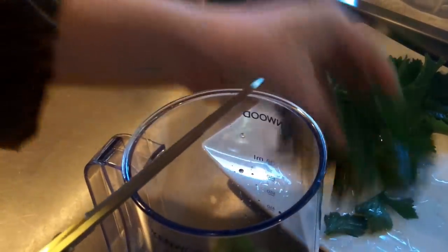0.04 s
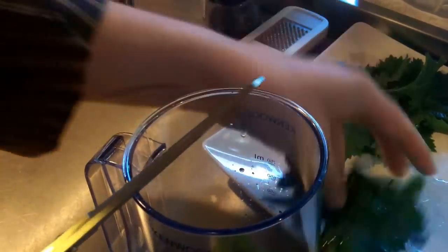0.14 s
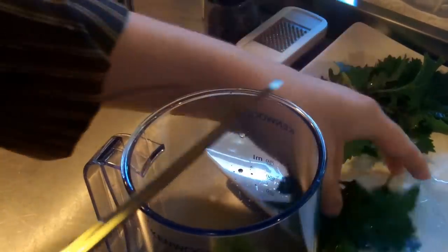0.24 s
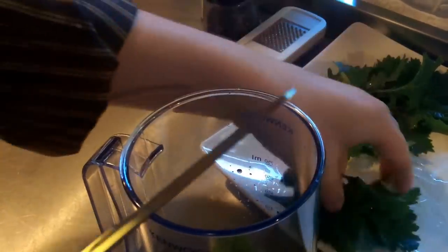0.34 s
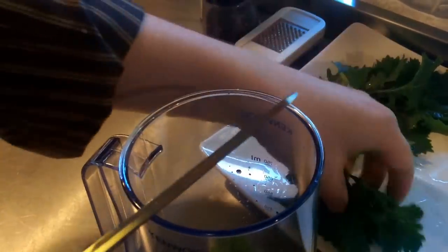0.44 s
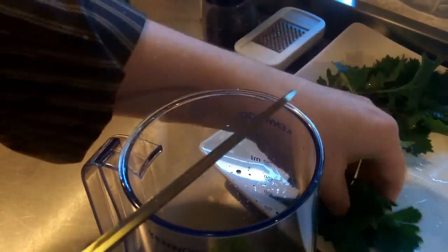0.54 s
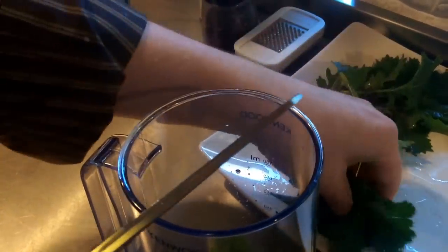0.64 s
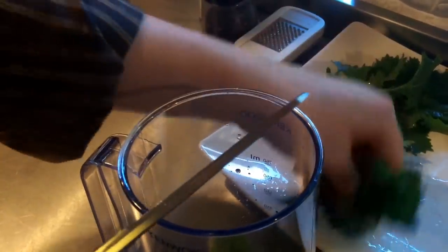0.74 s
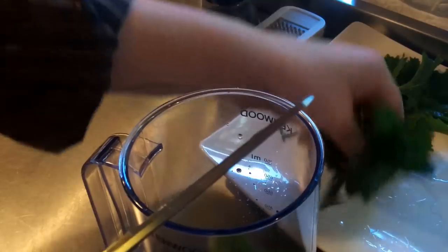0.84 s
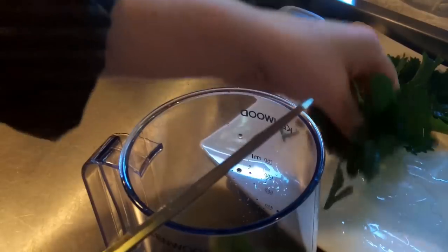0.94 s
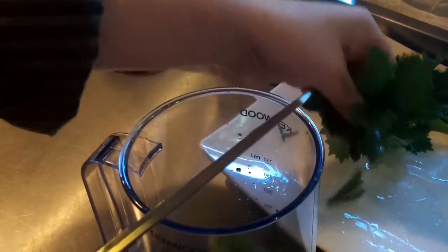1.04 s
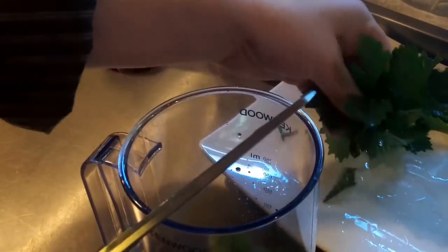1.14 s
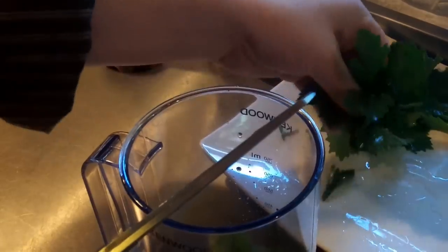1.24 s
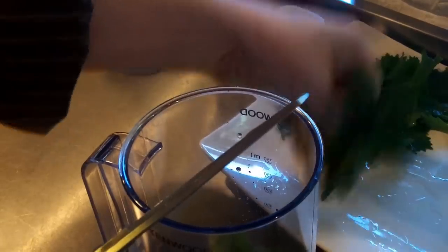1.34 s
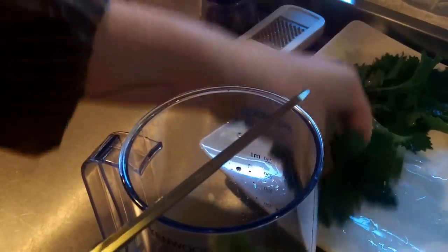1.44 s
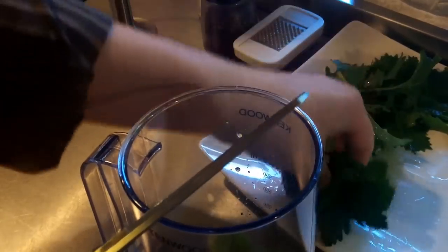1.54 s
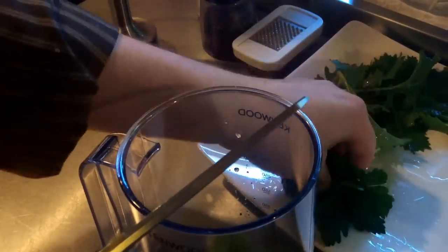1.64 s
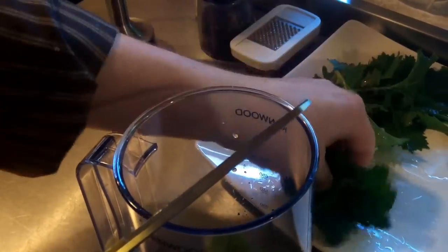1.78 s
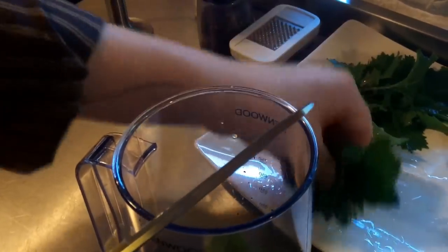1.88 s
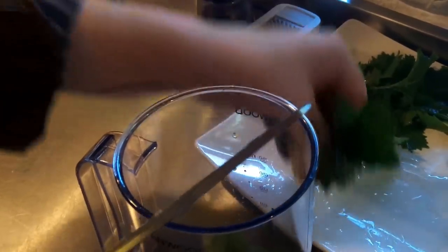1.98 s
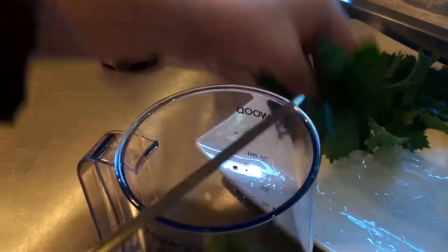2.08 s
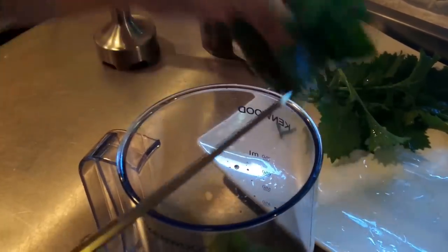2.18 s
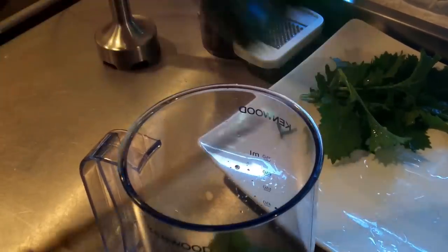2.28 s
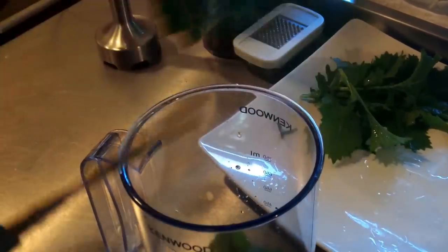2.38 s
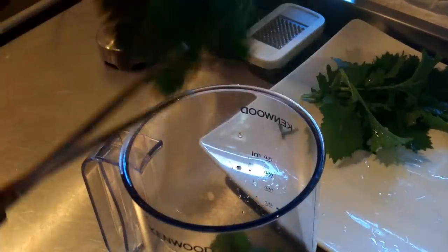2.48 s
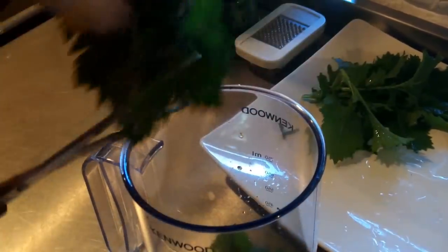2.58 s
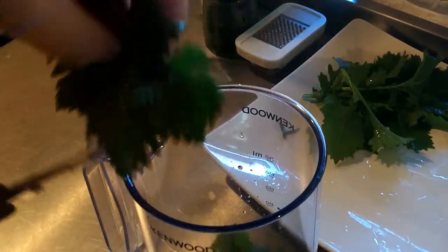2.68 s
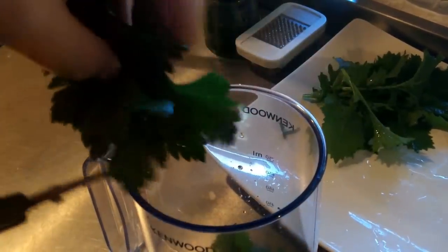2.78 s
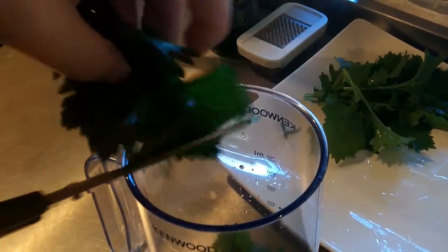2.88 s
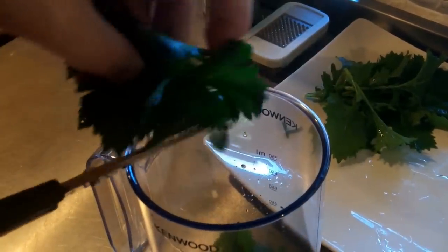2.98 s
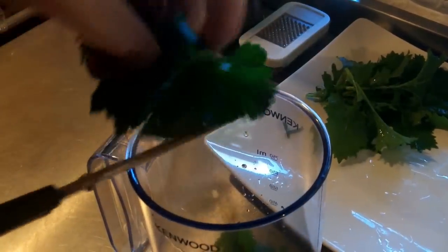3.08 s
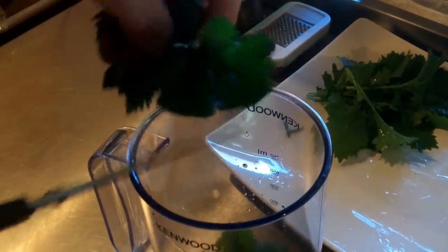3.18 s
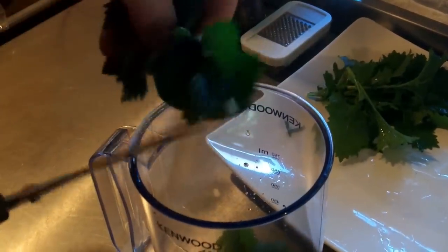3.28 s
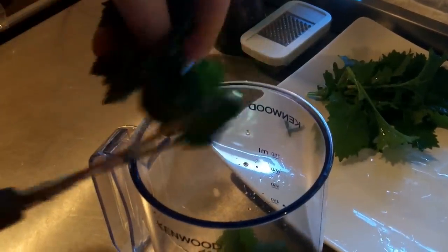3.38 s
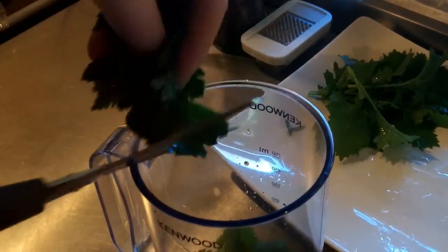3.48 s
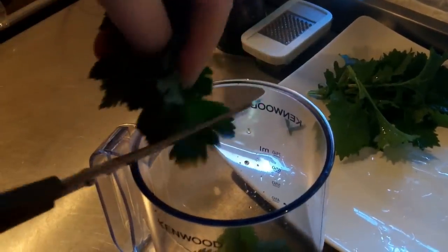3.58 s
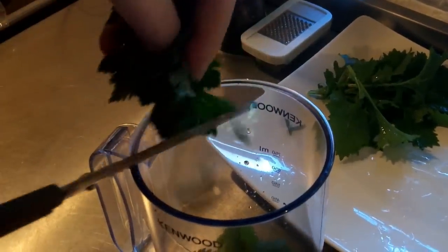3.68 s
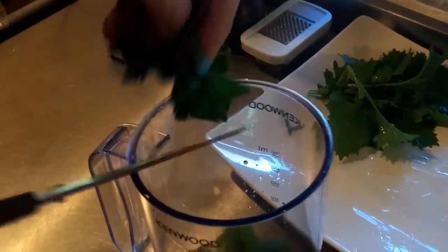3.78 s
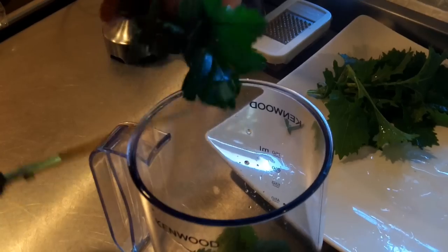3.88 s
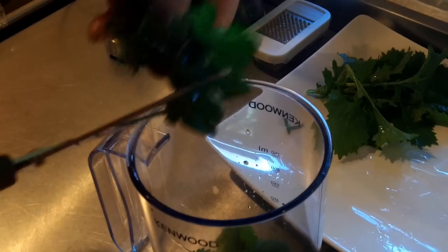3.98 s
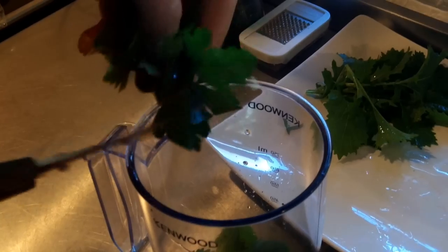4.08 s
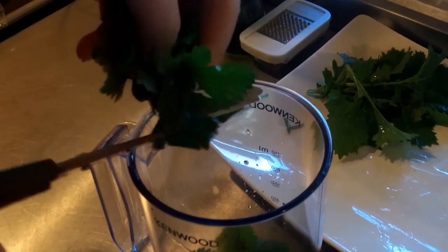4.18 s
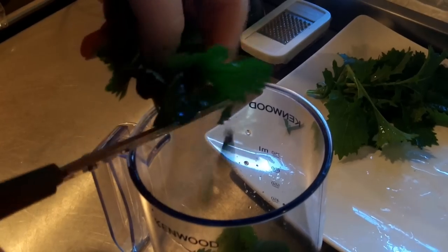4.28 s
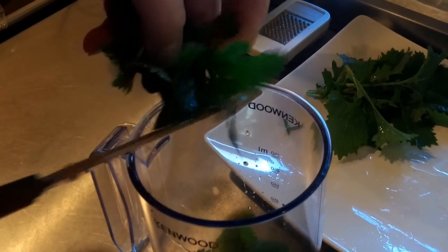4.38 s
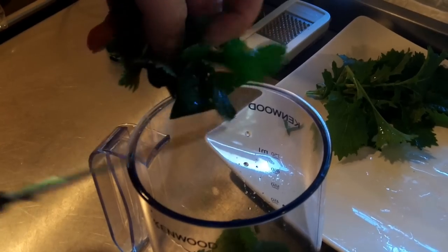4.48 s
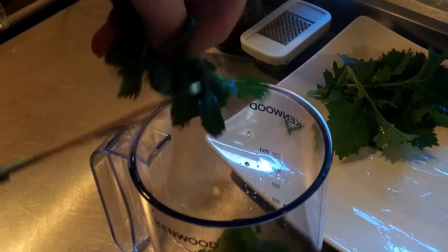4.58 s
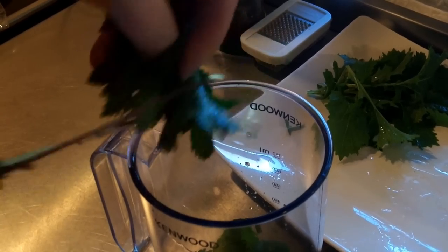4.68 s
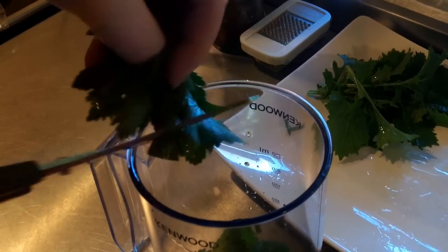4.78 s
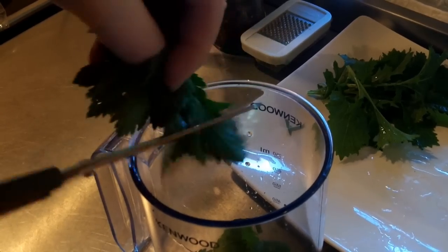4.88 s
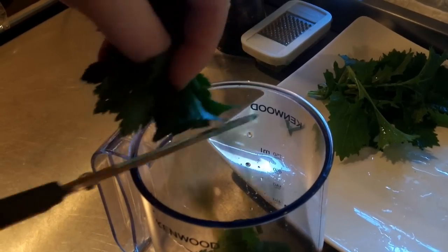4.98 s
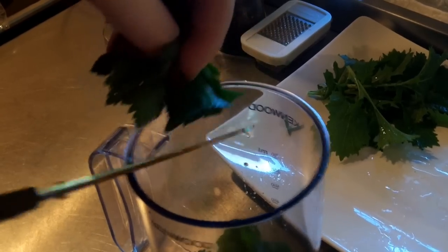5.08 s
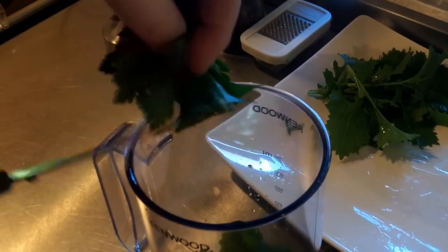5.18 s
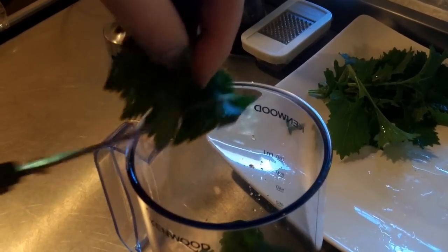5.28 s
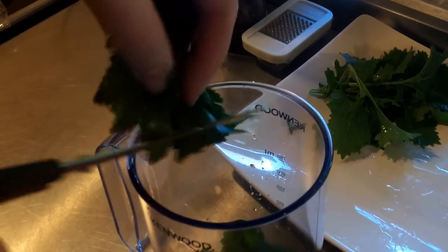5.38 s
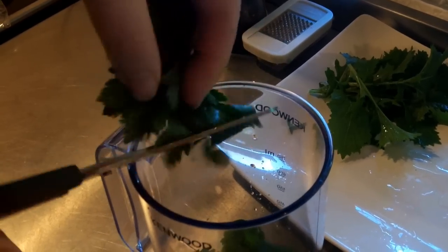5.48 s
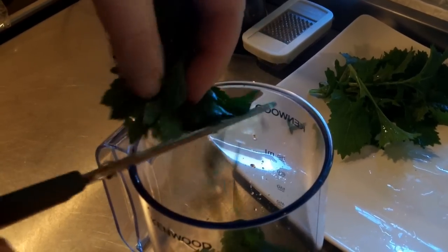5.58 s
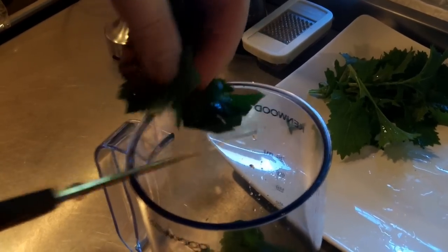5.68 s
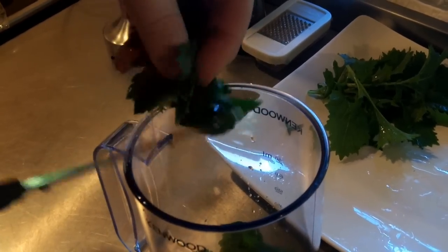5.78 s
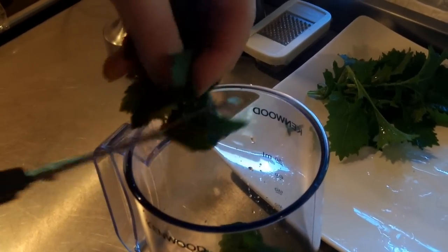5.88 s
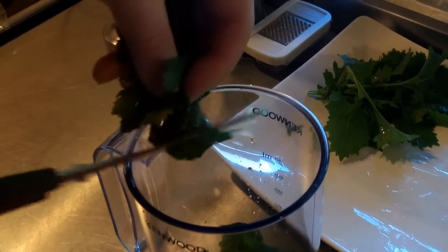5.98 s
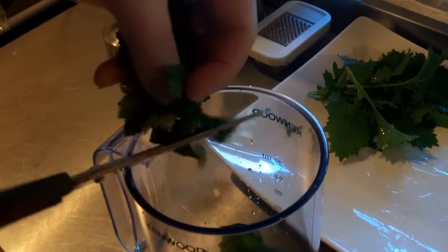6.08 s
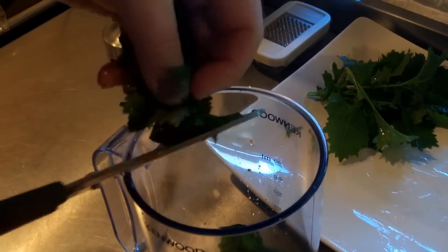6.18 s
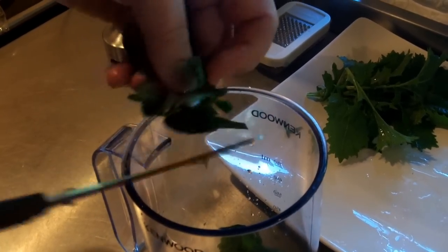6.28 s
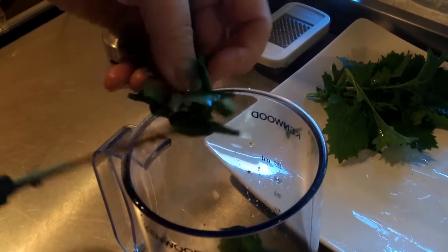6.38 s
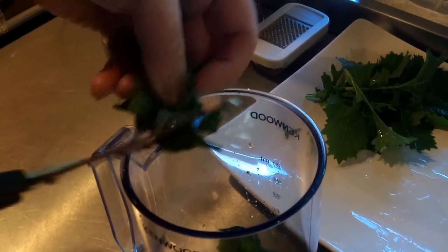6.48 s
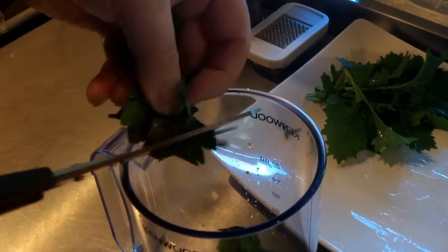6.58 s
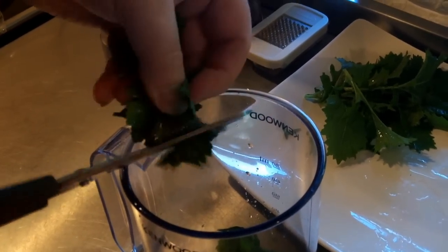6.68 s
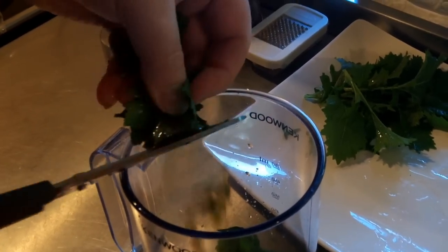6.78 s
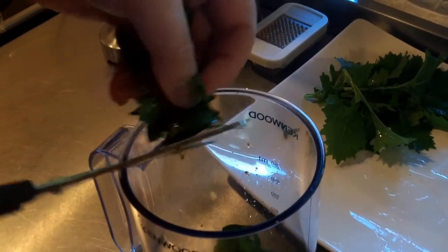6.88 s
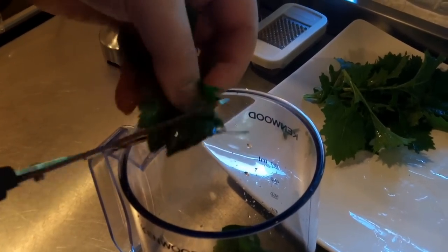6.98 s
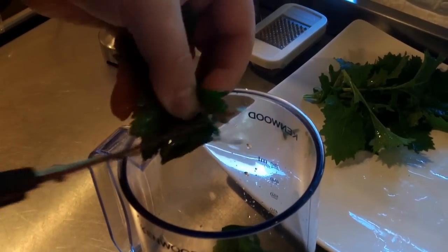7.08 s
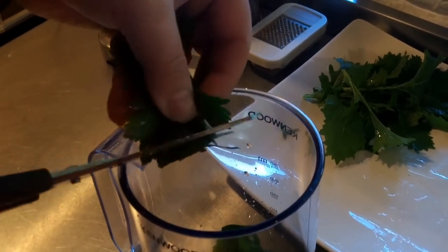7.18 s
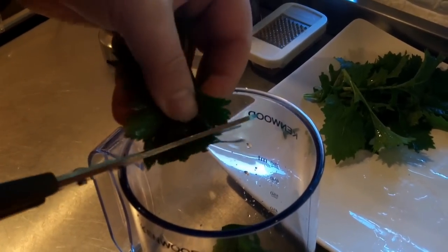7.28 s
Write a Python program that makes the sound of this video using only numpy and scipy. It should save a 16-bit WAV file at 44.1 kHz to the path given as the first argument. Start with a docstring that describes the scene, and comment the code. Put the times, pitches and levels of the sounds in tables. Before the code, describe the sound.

Kitchen scissors snip leafy herbs over a plastic jug, hard clacks ringing in a small room, with leaf rustle, stem snaps and steady faint hiss.

```python
"""Scissors on leafy herbs

Kitchen scissors snip herbs over a plastic jug in a small hard-walled kitchen, over low air noise and steady hiss.
Leaves rustle and crunch as clouds of tiny random fractures; knocks on the board are damped modes and noise bursts.
Stems snap as a few short modes with a brief spray of noise. Each cut sums modes of handles and blades with long
rings of the jug, standing waves of the room and diffuse echoes that decay at a rate set for each frequency band."""
import sys
import numpy as np
from scipy import signal
from scipy.fft import rfft, irfft
from scipy.io import wavfile

SR = 44100
rng = np.random.default_rng(int(sys.argv[2]) if len(sys.argv) > 2 else 0)


def transcribe(signal):
    """Save signal, clipped to [-1, 1], as a 16-bit WAV file at the path in sys.argv[1]."""
    frames = np.atleast_2d(signal).T
    limited = np.clip(frames, -1, 1)
    pcm = np.round(limited * 32767).astype(np.int16)
    wavfile.write(sys.argv[1], SR, pcm)


N = 323694
HIT_SIZE = 32768  # samples in one blow
TIME, AGE = np.arange(N) / SR, np.arange(HIT_SIZE) / SR  # seconds in the scene, seconds since a blow

# Event levels are nominal: knocks, bumps, snaps and cuts add offsets per layer; leaf levels are used directly.
# low rush of the kitchen: (frequency [Hz], level [dB])
AIR_SPECTRUM = [(20, -9), (45, -5), (75, -11), (110, -2), (150, -6.5), (220, -13.5), (280, -4.5),
                (360, -12), (480, -7), (700, -12.5), (1200, -12.5), (2500, -14.5), (4500, -16.5),
                (6500, -20.5)]
# fingers squeezing the leaves: (time of the height [s], level [dB], time from height to 1/e [s])
SQUEEZES = [(.74, -57.5, 0.1), (1.76, -63, .07), (3.02, -61.5, 0.18), (3.72, -58.5, .035),
            (4.327, -55.5, 0.037), (4.994, -53.5, 0.032), (5.573, -58, 0.092), (5.768, -53.5, 0.024),
            (6.19, -54, .04), (6.759, -56, 0.054)]
# stems crushed between fingers or blades: (time at the thickest [s], level [dB], half the 1/e time [s])
CRUNCHES = [(0.821, -50, .006), (4.616, -44.5, 0.012), (5.238, -45, 0.0025), (5.593, -41.5, 0.0057),
            (6.47, -43, 0.0033), (6.787, -34.5, 0.0032), (6.817, -39, 0.0033), (7.026, -37.5, 0.0034)]
# radiation of leaves and stems: (frequency [Hz], level [dB])
LEAF_SPECTRUM = [(200, -8), (1000, -14.5), (2000, -1.5), (3300, 1), (5000, 0.5), (6200, -6), (7500, -7.5)]
# handles ringing under a grinding blade: (frequency [Hz], level [dB], t60 [s])
GRIND_MODES = [(1457, 0, .22)]
# knocks while leaves are gathered from the board: (time [s], level [dB], boom level [dB])
KNOCKS = [(0.3481, -19.5, -24.5), (1.5615, -46, -49.5), (1.5843, -28.5, -35.5), (1.6189, -33, -40.5)]
# dull bump against the jug: (time [s], level [dB])
BUMPS = [(5.2734, -21)]
# board rung by a knock: (frequency [Hz], level [dB], t60 [s])
BOARD_MODES = [(136, 2.5, 0.36), (264.8, 10, 0.25), (284, -9, 0.45), (407, -8, 0.072), (446, -4.5, 0.85),
               (1220, 12.5, 0.03), (1660, 4, 0.064), (2130, 6, 0.039), (2780, 8, 0.067), (3070, 11, 0.029),
               (3420, 2, 0.044), (4060, 4, 0.052)]
# jug shifting on the worktop: (frequency [Hz], level [dB], t60 [s])
THUD_MODES = [(205, 0, 0.034), (290, 0, 0.16), (543, -3, 0.019)]
# dry crack of a blow: (frequency [Hz], level [dB])
CRACK_SPECTRUM = [(100, -24.5), (400, -4), (800, -19), (1300, 6.5), (2200, -14), (3000, 6.5), (3700, -19),
                  (5000, -6), (7500, -21)]
# room echoes of a knock: (frequency [Hz], level [dB])
KNOCK_ECHO_SPECTRUM = [(25, 0), (70, -24), (135, -4), (200, -10), (290, 2), (450, -1), (650, -5.5),
                       (1000, -7), (1700, -8), (3000, -15), (4500, -21), (7500, -46)]
# room echoes of a bump: (frequency [Hz], level [dB])
BUMP_ECHO_SPECTRUM = [(25, -18), (90, -1.5), (200, -12), (320, 3), (480, -1), (800, -10), (1500, -19.5),
                      (3500, -27.5), (7500, -60)]
# worktop rumbling on after a knock: (frequency [Hz], level [dB])
WORKTOP_SPECTRUM = [(25, 0.5), (130, 3.5), (300, 1), (480, -4.5), (700, -17), (2000, -19.5), (5000, -37)]
# kitchen reverberation: (band centre [Hz], t60 [s])
ROOM_T60 = [(60, 0.63), (150, 0.75), (300, 0.29), (600, 0.26), (1300, .28), (3000, 0.19), (7000, 0.27)]
# standing waves of the kitchen: (frequency [Hz], level [dB], t60 [s])
ROOM_MODES = [(74, 4.5, 0.25), (98, 7, 0.49), (130.5, 0.5, 0.77), (161, 2, 0.34), (199.9, 8.5, 0.31),
              (252.5, 2.5, 0.64), (283, -1, 0.53), (313.4, 5.5, 0.33)]
# thick stems snapping: (time [s], level [dB], pitch [Hz])
SNAPS = [(0.6973, -42, 2780), (1.8445, -42, 4470), (2.5155, -29, 4000), (2.8379, -42, 3500),
         (3.1096, -33.5, 2210), (3.6182, -36.5, 5100), (4.3978, -31, 2240), (4.699, -37, 4300),
         (5.583, -34, 4750), (6.018, -41.5, 3280), (6.108, -39.5, 3900), (6.146, -24.5, 3410),
         (6.2062, -32, 4560), (6.2304, -37.5, 4240), (6.7414, -43, 3650), (6.787, -26, 3150),
         (6.8102, -38, 2920)]
# partials of a breaking stem: (multiple of its pitch [ratio], level [dB], t60 [s])
STEM_PARTIALS = [(.64, -7.5, 0.0074), (1, 0.5, 0.0073), (1.35, -2, .006), (1.62, -3, 0.012)]
# scissors closing: (time [s], handle clack [dB], blade click [dB], jug and room [dB])
SNIPS = [(3.899, -9.5, -20, -26.5), (4.565, -8.5, -19, -28), (5.179, -13, -24, -27),
         (5.3547, -30, -37.5, -45.5), (5.8097, -10.5, -21.5, -27.5), (6.4048, -11.5, -20.5, -29),
         (6.9487, -16.5, -35, -30.5)]
# plastic handles: (frequency [Hz], level [dB], t60 [s])
HANDLE_MODES = [(480, -18, 0.14), (836, -19.5, 0.039), (1242, -3, 0.04), (1474, -9.5, 0.051)]
# steel blades: (frequency [Hz], level [dB], t60 [s])
BLADE_MODES = [(2067, -9, 0.038), (2800, -12, 0.025), (2680, -1, 0.0068), (3184, -2, 0.015),
               (3375, -3, 0.011), (4124, -2.5, 0.016), (4180, -14, 0.0091), (5380, -1.5, 0.0074),
               (5680, -4.5, 0.0077), (6570, -15, 0.011), (7350, -7.5, 0.006)]
# contact of the blades, over within a few cycles: (frequency [Hz], level [dB], t60 [s])
CONTACT_MODES = [(3000, -2, 0.001), (5050, 0, 0.0009)]
# long resonances of jug and scissors: (frequency [Hz], level [dB], t60 [s])
JUG_MODES = [(410, -3, .33), (451, 0, .3), (577, -6, .33), (641, -10, .3), (705, -13, .4),
             (807, -12.5, .35), (881, -13, .3), (1244, -7.5, .28), (1457, -7, .28), (2470, -26, .26),
             (3055, -15.5, .26), (3220, -24, .2), (3430, -25, .22), (4150, -25, .22), (4344, -21, .2)]
# room echoes of a cut: (frequency [Hz], level [dB])
SNIP_ECHO_SPECTRUM = [(25, -6), (70, -1.5), (160, -9), (280, 1), (480, 4.5), (700, -4.5), (1000, -8),
                      (1300, -4), (1550, -11), (1800, -17), (2400, -18.5), (3200, -13), (4400, -24.5),
                      (6000, -33.5), (7500, -48)]
# microphone response: (frequency [Hz], gain [dB])
MIC_RESPONSE = [(6000, 0), (7100, -1.5), (7400, -11.5), (7700, -19), (8000, -19), (8500, -15.5),
                (10000, -13), (15000, -16)]
# electronic hiss: (frequency [Hz], level [dB])
HISS_SPECTRUM = [(7000, -50), (8050, -23), (8500, -5.5), (9300, -1), (11000, 0.5), (15500, -0.5)]

HANDLING_DB = -72.5  # faint rustle of the bunch as it is held
GRIND_S, GRIND_DB = 7.021, -35.5  # steel grinds on steel at the end of the last cut
WORKTOP_T60 = .9  # s
STALK_DB, STALK_HZ = -44, 3900  # middle of the range of chance stalk snaps
HOLD_S = 0.19  # how long echoes hold after a nominal 0 dB clack; softer clacks hold in proportion
BOOM_DB = -7.5  # standing waves after a nominal 0 dB clack, relative to the jug and room level
TOP_HZ = 15500  # upper edge of the recorded band


def undb(db):
    """Logarithmic level: decibels become an amplitude ratio."""
    return 10 ** (np.asarray(db) / 20)


def unit(x):
    """Root-mean-square amplitude: scale to rms 1."""
    return x / np.sqrt(np.mean(x ** 2))


def lookup(hz, points):
    """Logarithmic frequency scale: interpolate (Hz, value) points along it."""
    f, value = np.transpose(points)
    return np.interp(np.log(np.maximum(hz, 1)), np.log(f), value)


def shape(x, points):
    """Linear filtering: multiply the spectrum by a response of (Hz, dB) points."""
    hz = np.fft.rfftfreq(len(x), 1 / SR)
    return irfft(rfft(x) * undb(lookup(hz, points)), len(x))


def colour(x, points):
    """Spectral colouring: filter by (Hz, dB) points, then scale to rms 1."""
    return unit(shape(x, points))


def fade(t, t60):
    """Exponential decay: linear losses take 60 dB in t60."""
    return np.exp(-np.log(1000) * t / t60)


def swell(rise_s):
    """Resonator build-up: amplitude approaches its full value exponentially after the blow."""
    return 1 - np.exp(-AGE / rise_s)


def burst(points, t60):
    """Decaying random vibration: coloured noise under an exponential envelope."""
    return colour(rng.standard_normal(HIT_SIZE), points) * fade(AGE, t60)


def ring(modes, detune, scatter_db):
    """Modal superposition: damped sines of alternating sign, each blow varying pitch and level a little."""
    chance = rng.standard_normal((len(modes), 2))
    out = np.zeros(HIT_SIZE)
    for k, ((hz, db, t60), (level_chance, pitch_chance)) in enumerate(zip(modes, chance)):
        tone = np.sin(2 * np.pi * hz * (1 + detune * pitch_chance) * AGE)
        out += (-1) ** k * undb(db + scatter_db * level_chance) * fade(AGE, t60) * tone
    return out


def waver(modes, depth, rate):
    """Multipath interference: random complex gains, rate knots a second, make each mode swell and sink alone."""
    knots = np.arange(64) / rate
    out = np.zeros(HIT_SIZE)
    for k, (hz, db, t60) in enumerate(modes):
        paths = np.interp(AGE, knots, rng.standard_normal(64) + 1j * rng.standard_normal(64))
        tone = np.imag((1 + depth * paths) * np.exp(2j * np.pi * hz * AGE))
        out += (-1) ** k * undb(db) * fade(AGE, t60) * tone
    return out


def room(points, hold_s, rise_s):
    """Diffuse reverberation: echoes build up, hold, then decay at each band's own rate."""
    spectrum = rfft(colour(rng.standard_normal(HIT_SIZE), points))
    hz = np.fft.rfftfreq(HIT_SIZE, 1 / SR)
    late = np.cbrt(AGE ** 3 + hold_s ** 3) - hold_s  # a clock that starts slowly, so the decay is held back
    out = np.zeros(HIT_SIZE)
    for centre, t60 in ROOM_T60:
        # overlapping triangular bands that sum to one
        share = lookup(hz, [(f, float(f == centre)) for f, _ in ROOM_T60])
        out += irfft(spectrum * share) * fade(late, t60)
    return out * swell(rise_s)


def add(track, s, sound):
    """Linear superposition: mix a sound into the track at time s."""
    start = int(s * SR)
    track[start:start + len(sound)] += sound[:N - start]


def kitchen_air():
    """Stationary noise: the low rush of the kitchen has a fixed spectrum."""
    return undb(-54.5) * colour(rng.standard_normal(N), AIR_SPECTRUM)


def squeeze():
    """Frictional effort: each squeeze of the leaves follows a Gaussian bell in time."""
    return sum(undb(db) * np.exp(-((TIME - s) / width_s) ** 2) for s, db, width_s in SQUEEZES)


def crackle(per_s, spread_db):
    """Random fracture process: plant cells break as chance clicks of uneven size and either sign."""
    when, size = rng.random(N), rng.standard_normal(N)
    grain_db = spread_db * np.minimum(rng.exponential(size=N), 4)
    clicks = (when < per_s / SR) * np.sign(size) * undb(grain_db)
    return colour(clicks, LEAF_SPECTRUM)


def leaves():
    """Amplitude-modulated fracture noise: sparse rustle follows the squeezes, denser crackle the crunches."""
    out = (undb(HANDLING_DB) + squeeze()) * crackle(per_s=300, spread_db=1.5)
    fractures = crackle(per_s=2200, spread_db=1.5)
    for s, db, half_s in CRUNCHES:
        out += undb(db) * np.exp(-abs(TIME - s) / (2 * half_s)) * fractures
    # when steel grinds on steel the handles sing along
    handles = ring(GRIND_MODES, detune=0.0019, scatter_db=1)
    add(out, GRIND_S, undb(GRIND_DB) * handles * swell(rise_s=0.0016))
    return out


def knocks():
    """Impact excitation: modes and a noisy crack sound together with echoes and worktop rumble."""
    out = np.zeros(N)
    for s, level_db, boom_db in KNOCKS:
        board = undb(level_db - 18.5) * waver(BOARD_MODES, depth=0.47, rate=54)
        crack = undb(level_db - 10.5) * burst(CRACK_SPECTRUM, t60=0.073)
        echoes = undb(boom_db - 6.5) * room(KNOCK_ECHO_SPECTRUM, hold_s=0.031, rise_s=0.00074)
        rumble = undb(boom_db - 14) * burst(WORKTOP_SPECTRUM, WORKTOP_T60) * swell(rise_s=0.012)
        add(out, s, (crack + board) * swell(rise_s=.0005) + echoes + rumble)
    return out


def stalks(count, spread_db, spread_octaves):
    """Load-driven failure: thin stalks snap by chance, likelier the firmer the squeeze."""
    effort = np.cumsum(squeeze())
    rows = []
    for when, size, pitch in rng.random((count, 3)):
        s = np.interp(when, effort / effort[-1], TIME)
        level_db = STALK_DB + spread_db * (2 * size - 1)
        hz = STALK_HZ * 2 ** (spread_octaves * (2 * pitch - 1))
        rows.append((s, level_db, hz))
    return rows


def snaps():
    """Sudden release of strain: a stem's modes, and a strong, brief spray of noise with a weaker, longer tail."""
    out = np.zeros(N)
    for s, level_db, hz in SNAPS + stalks(count=8, spread_db=2.5, spread_octaves=0.44):
        modes = [(hz * ratio, db, t60) for ratio, db, t60 in STEM_PARTIALS]
        stem = ring(modes, detune=.015, scatter_db=1.2)
        spray_envelope = undb(-1) * fade(AGE, t60=0.0062) + undb(-13) * fade(AGE, t60=0.13)
        spray = rng.standard_normal(HIT_SIZE) * spray_envelope
        add(out, s, undb(level_db) * (undb(-1) * stem + spray))
    return shape(out, LEAF_SPECTRUM)  # so small a thing radiates mainly treble


def scissors():
    """Coupled impact: handles clack, blades click, jug and room ring; a harder clack holds echoes longer."""
    out = np.zeros(N)
    for s, clack_db, click_db, room_db in SNIPS:
        clack = undb(clack_db + .5) * ring(HANDLE_MODES, detune=.003, scatter_db=.4)
        click = undb(click_db + 2.0) * ring(BLADE_MODES, detune=0.0074, scatter_db=1.5)
        contact = undb(click_db + 10.0) * ring(CONTACT_MODES, detune=0.013, scatter_db=1.8)
        # the worktop and the jug wall scatter the click back within milliseconds
        scatter = undb(click_db - 7.5) * burst(LEAF_SPECTRUM, t60=0.047)
        rings = undb(room_db + 3.0) * waver(JUG_MODES, depth=0.45, rate=69.4) * swell(rise_s=0.025)
        # a harder clack feeds the standing waves more energy
        boom_db = room_db + clack_db / 2 + BOOM_DB
        boom = undb(boom_db) * waver(ROOM_MODES, depth=0.35, rate=23.4) * swell(rise_s=0.019)
        hold_s = HOLD_S * undb(clack_db)
        echoes = undb(room_db - 2.0) * room(SNIP_ECHO_SPECTRUM, hold_s, rise_s=0.00074)
        add(out, s - .0007, clack + click + contact + scatter + rings + boom + echoes)
    return out


def jug_bumps():
    """Low-frequency impact: the jug shifts with a dull thud that excites the standing waves of the room."""
    out = np.zeros(N)
    for s, level_db in BUMPS:
        thud = undb(level_db - 3.5) * waver(THUD_MODES, depth=0.17, rate=44)
        crack = undb(level_db - 26) * burst(CRACK_SPECTRUM, t60=.04)
        boom = undb(level_db - 18.5) * waver(ROOM_MODES, depth=0.34, rate=21.5) * swell(rise_s=0.0092)
        echoes = undb(level_db - 9.5) * room(BUMP_ECHO_SPECTRUM, hold_s=0.035, rise_s=0.0017)
        add(out, s, thud + crack + boom + echoes)
    return out


def scene():
    """Superposition: all sources on the worktop add to the air of the kitchen."""
    return (kitchen_air() + leaves() + knocks() + snaps() + scissors() + jug_bumps())[None]


def record(dry):
    """Band limitation: the microphone weakens the treble, hiss is added, and a steep low-pass ends the band."""
    hiss = undb(-60.5) * colour(rng.standard_normal(N), HISS_SPECTRUM)
    heard = shape(dry[0], MIC_RESPONSE) + hiss
    # order 10, 0.2 dB passband ripple, 70 dB stopband attenuation
    low_pass = signal.ellip(10, .2, 70, TOP_HZ, fs=SR, output="sos")
    return signal.sosfilt(low_pass, heard)[None]


dry = scene()
out = record(dry)
transcribe(out)
```